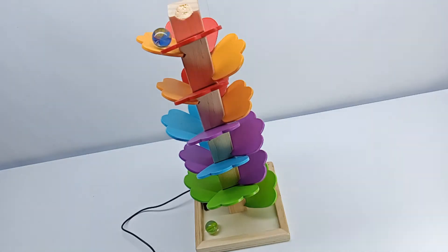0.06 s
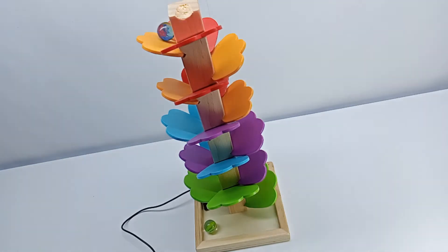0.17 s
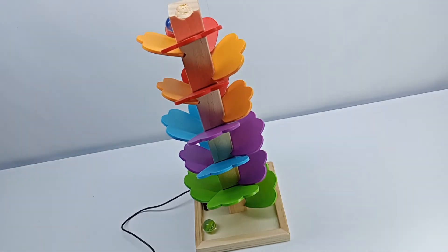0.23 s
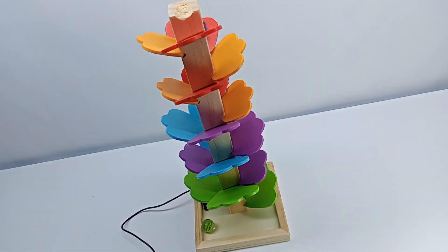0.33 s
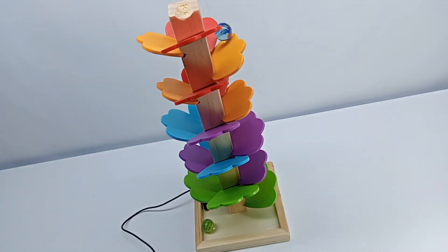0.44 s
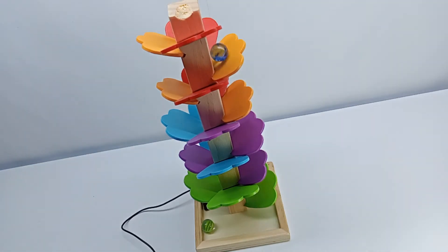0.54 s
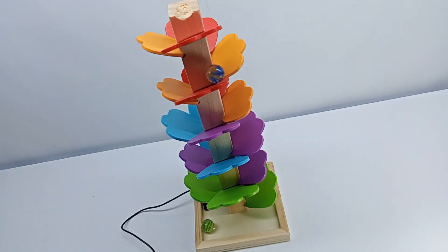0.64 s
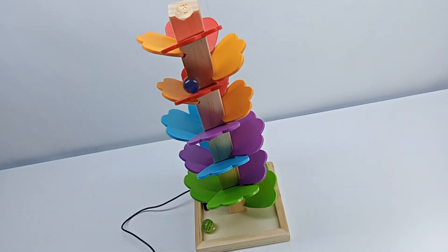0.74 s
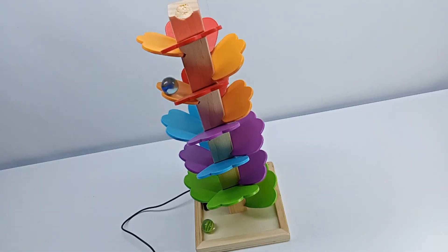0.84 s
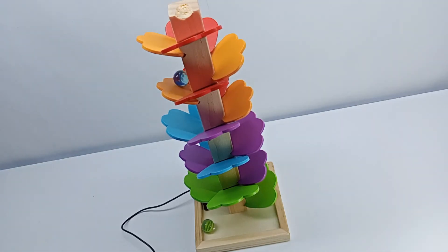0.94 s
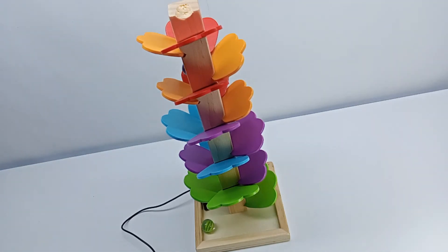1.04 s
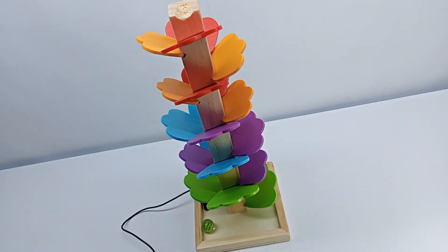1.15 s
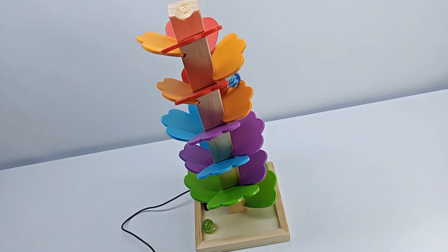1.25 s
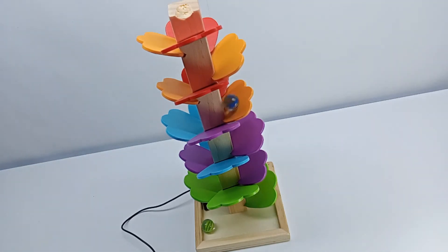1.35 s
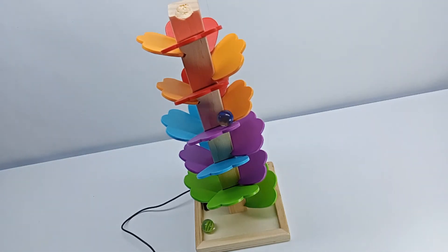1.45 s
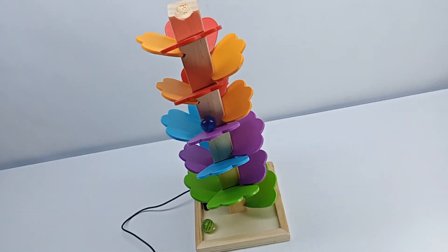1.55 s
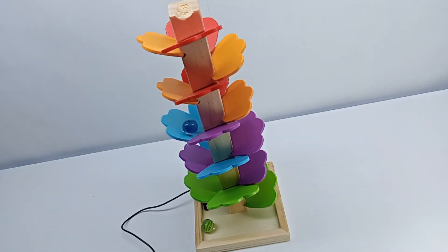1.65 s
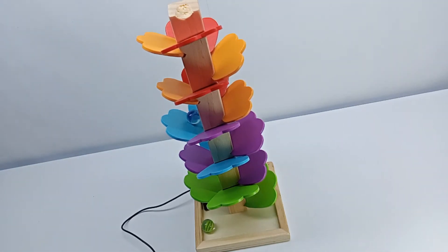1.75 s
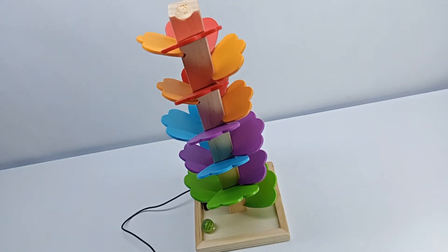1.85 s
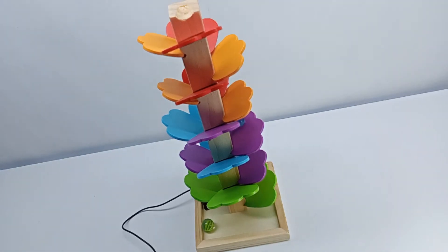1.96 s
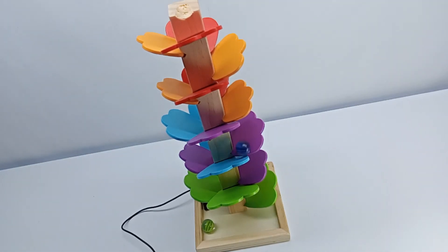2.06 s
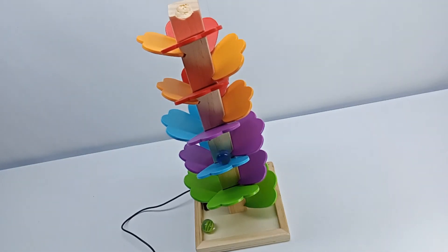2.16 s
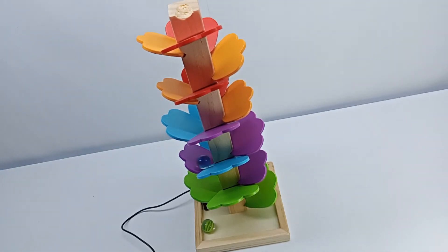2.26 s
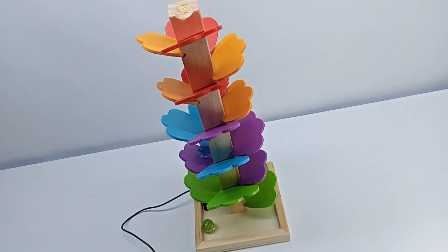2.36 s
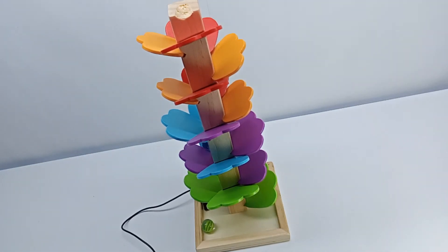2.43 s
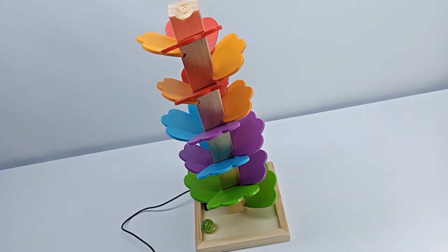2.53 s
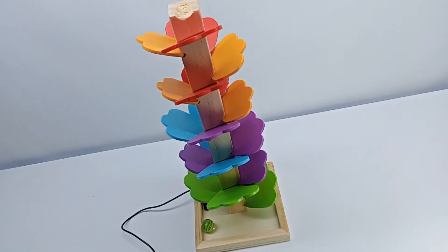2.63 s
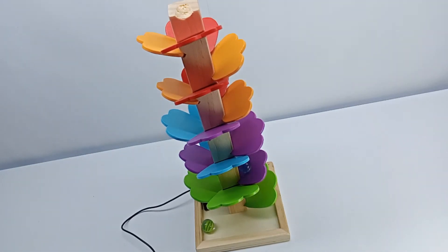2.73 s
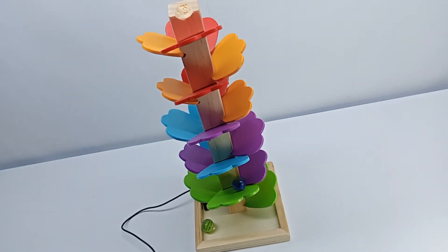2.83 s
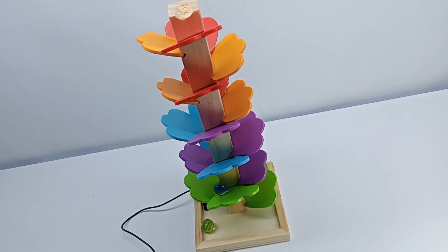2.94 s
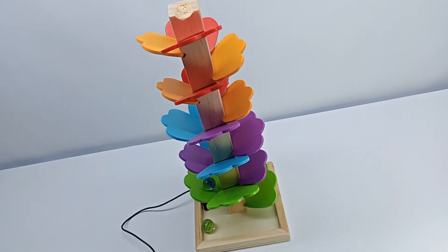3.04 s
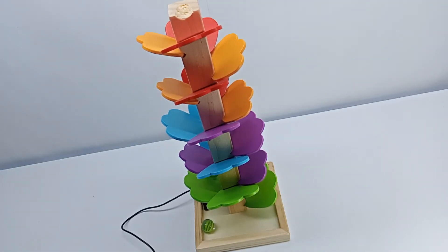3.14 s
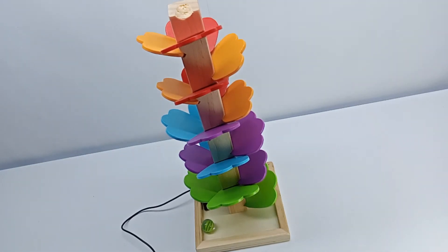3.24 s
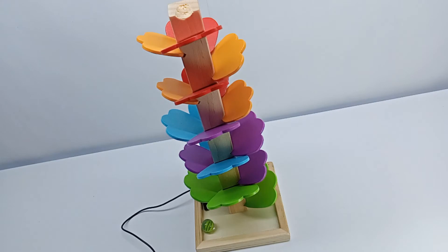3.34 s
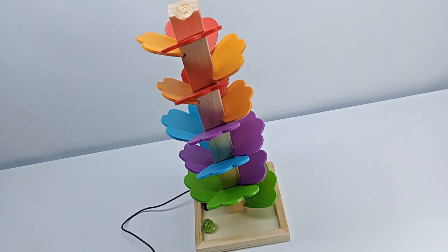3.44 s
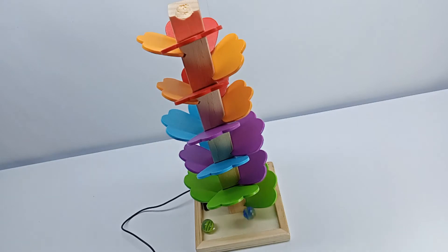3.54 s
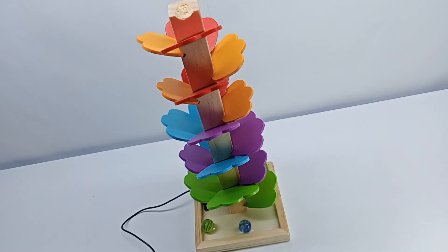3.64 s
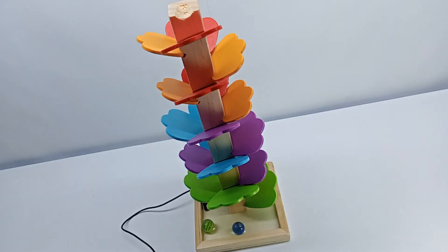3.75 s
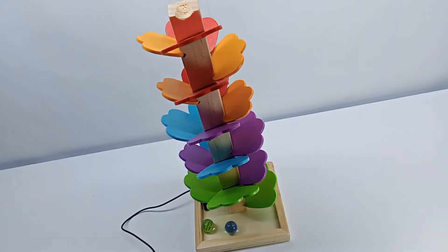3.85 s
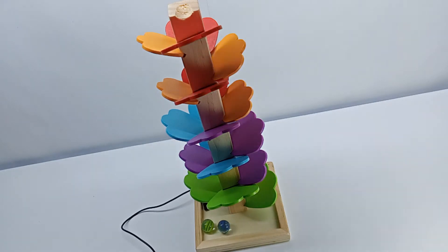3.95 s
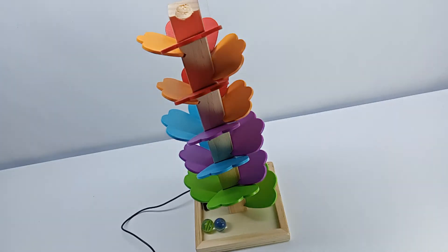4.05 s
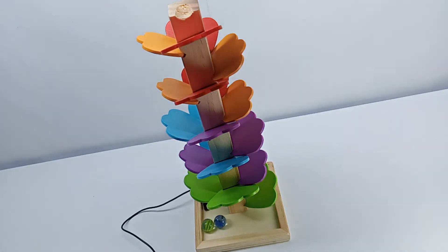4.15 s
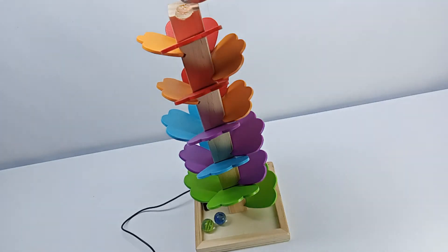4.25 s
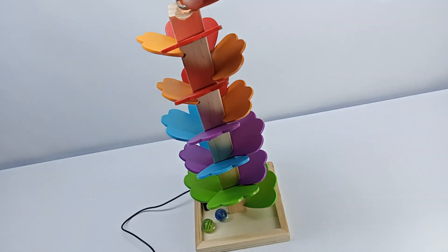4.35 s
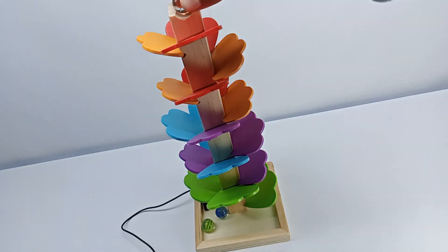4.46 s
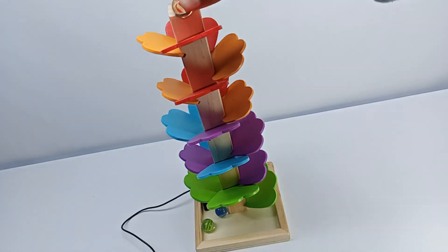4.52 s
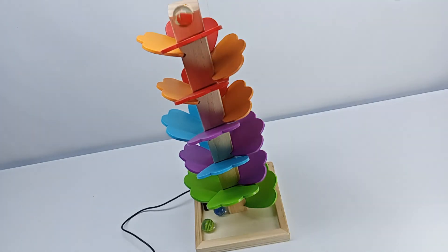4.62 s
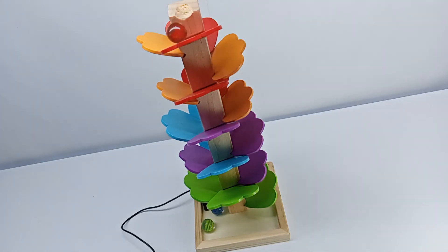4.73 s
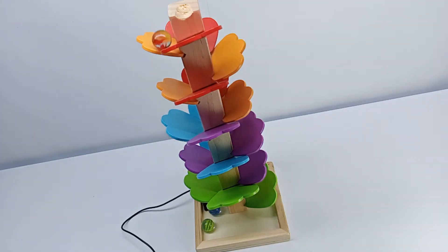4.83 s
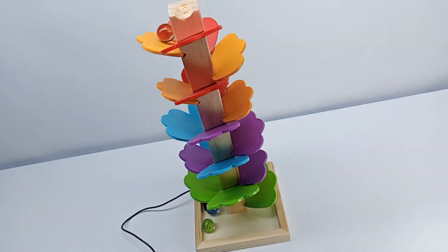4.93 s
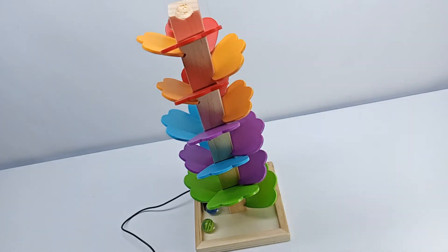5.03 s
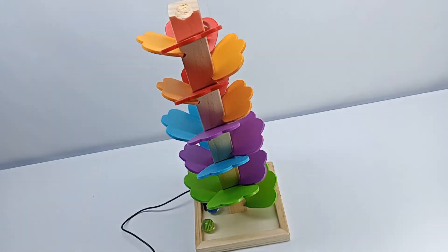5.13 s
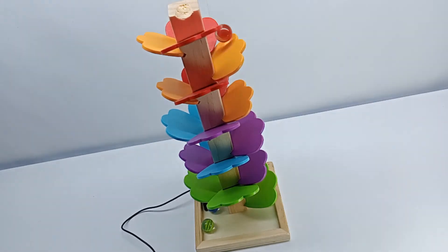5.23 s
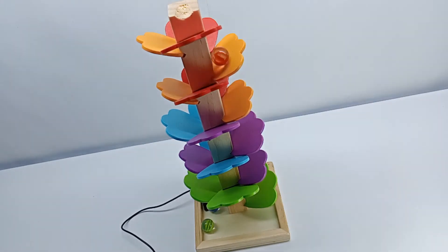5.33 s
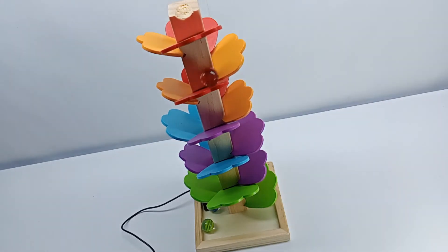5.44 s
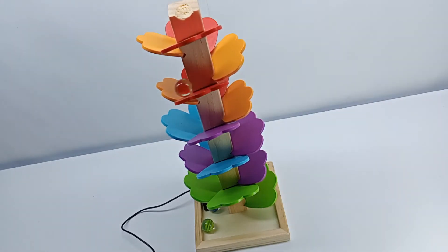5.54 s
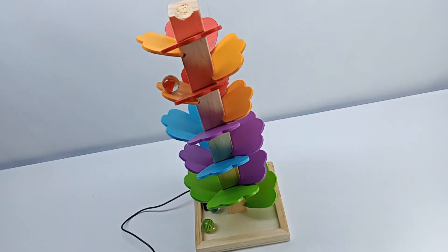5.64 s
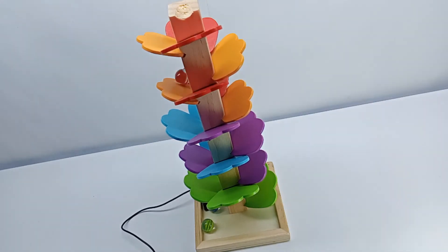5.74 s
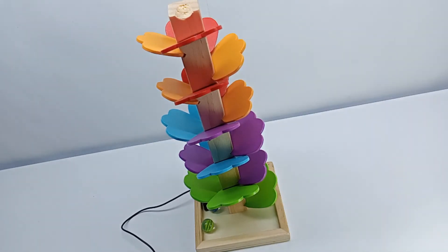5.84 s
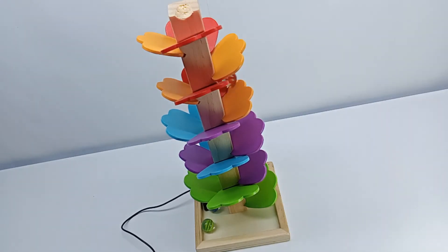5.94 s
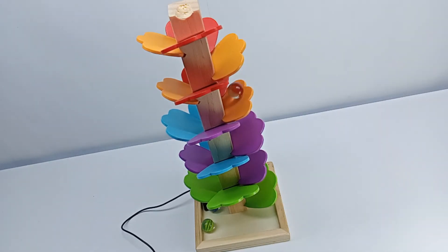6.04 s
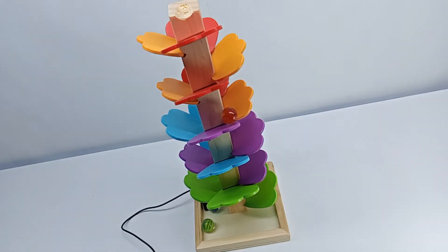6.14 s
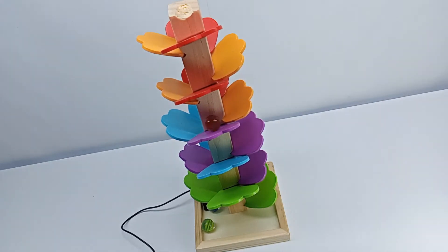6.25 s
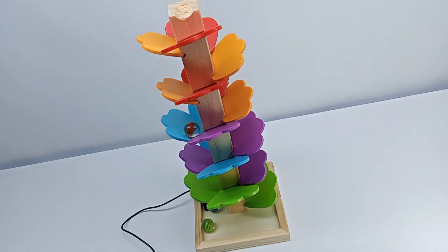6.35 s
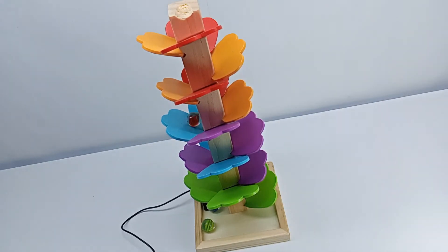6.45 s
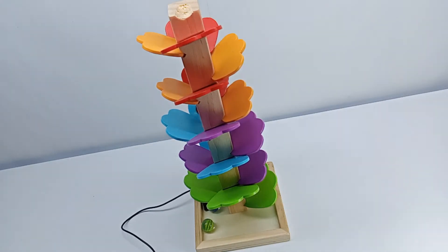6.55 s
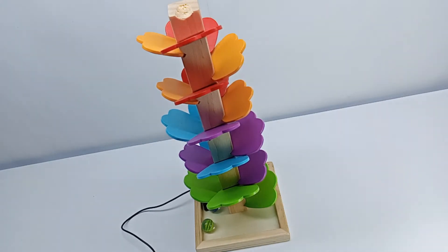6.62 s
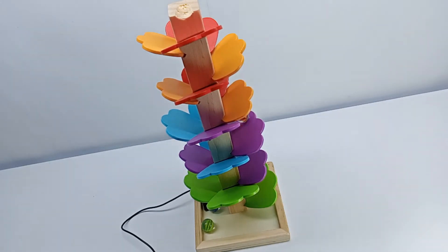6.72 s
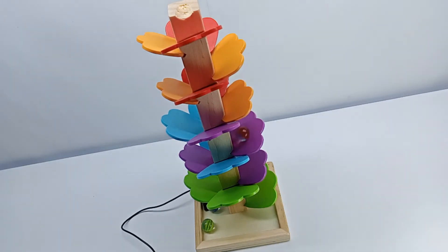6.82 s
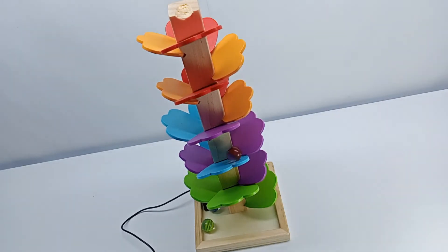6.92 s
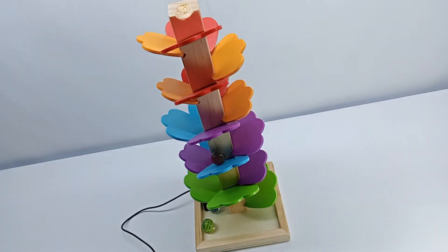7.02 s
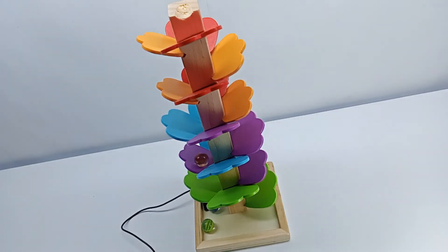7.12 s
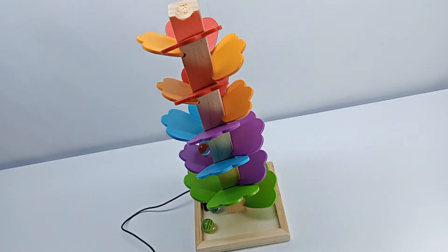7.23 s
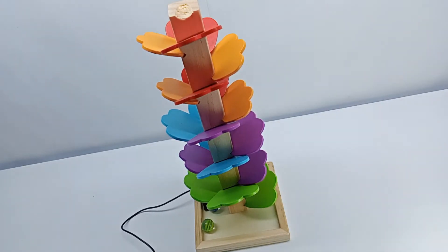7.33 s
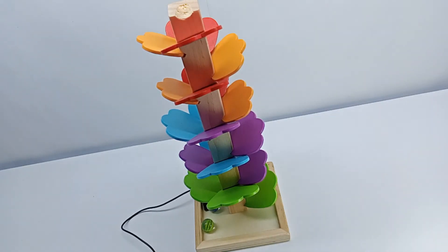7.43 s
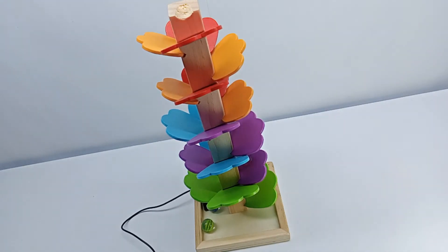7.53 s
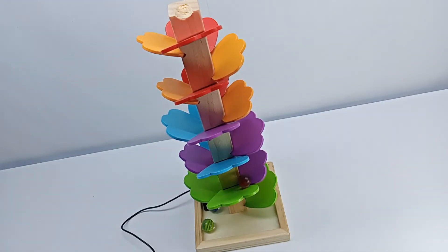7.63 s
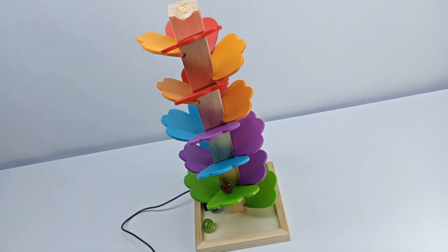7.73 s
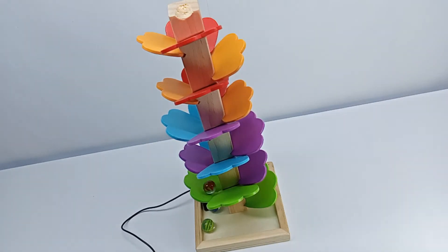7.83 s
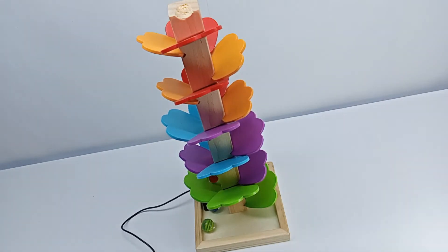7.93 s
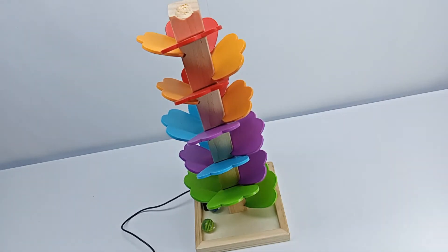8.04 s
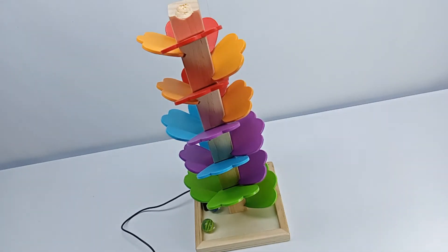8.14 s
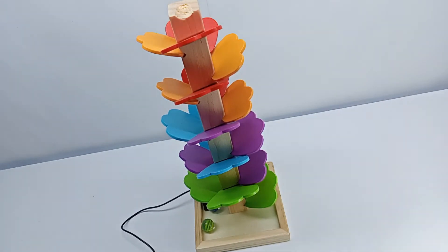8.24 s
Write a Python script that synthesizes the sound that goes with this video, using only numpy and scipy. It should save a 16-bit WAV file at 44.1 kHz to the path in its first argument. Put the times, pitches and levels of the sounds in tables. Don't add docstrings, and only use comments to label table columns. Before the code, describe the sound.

A glass marble clacks rapidly down a wooden leaf tower into a hollow tray, then after a short pause a second follows.

```python
import sys
import numpy as np
from scipy import signal
from scipy.fft import rfft, irfft
from scipy.io import wavfile
from scipy.ndimage import uniform_filter1d

SR = 44100
rng = np.random.default_rng(int(sys.argv[2]) if len(sys.argv) > 2 else 0)


def invert_db(level):
    return 10 ** (np.asarray(level, dtype=float) / 20)


def dump(signal):
    limited = np.clip(np.atleast_2d(signal).T, -1, 1)
    pcm = np.round(limited * 32767).astype(np.int16)
    wavfile.write(sys.argv[1], SR, pcm)


N = 365139

# deep_hz, low_hz, middle_hz, high_hz, treble_hz
LEAF_HZ = [(1680, 2690, 4110, 6050, 8100), (1610, 2970, 3640, 5620, 9020), (1680, 2480, 4310, 5880, 7620),
           (2020, 2650, 3550, 5100, 8700), (1610, 2690, 4350, 4950, 8440), (2020, 2580, 3620, 6330, 9020),
           (1700, 2630, 3750, 4910, 8030), (1700, 2580, 3380, 5040, 9070), (2020, 2760, 3750, 6140, 8440),
           (1920, 2390, 3600, 5120, 8510), (2020, 3120, 3400, 5040, 8420), (2020, 2650, 3880, 6890, 9300),
           (2020, 2560, 3380, 7210, 7470), (1380, 2560, 3700, 6720, 8890), (1890, 3100, 3620, 4930, 7840),
           (1700, 2280, 3400, 6870, 9240), (1680, 2610, 3290, 6460, 7710), (1720, 2610, 3270, 7110, 9020),
           (1740, 2450, 3270, 5990, 8720), (1530, 2430, 3360, 5510, 8740), (2020, 3100, 3270, 5900, 7520),
           (1570, 3060, 4240, 7320, 8650)]
# deep_db, low_db, middle_db, high_db, treble_db
LEAF_DB = [(-25, -12, -12, -1, -12.5), (-27, -17.5, -6, -5, -10), (-20.5, -10.5, -1, -9, -9),
           (-36, -21.5, -7.5, -2.5, -9.5), (-23, -11, -3, -7, -11.5), (-42.5, -7.5, -6, -4.5, -14.5),
           (-24, -6.5, -4.5, -8.5, -14), (-28.5, -10, -5, -1.5, -9.5), (-16, -7, -7.5, -8.5, -9),
           (-18.5, -2, -2.5, -2.5, -7.5), (-25.5, -9, 0, -7, -3), (-22.5, -4, -6.5, -3.5, -5.5),
           (-17.5, -6, -12.5, -10.5, -15), (-23, -5, -2.5, -7, -11), (-23, -11, -4.5, -9.5, -7),
           (-18, -5.5, -6.5, -11, -8.5), (-12.5, -3.5, -5.5, -7, -10.5), (-19, -8.5, -7.5, -8, -11),
           (-12, -6, -4, -7.5, -11), (-12.5, -5, -1, -3, -7.5), (-19, -3, -12, -7.5, -10.5),
           (-17, -17, -10, -14, 1.5)]
TRAY_INDEX, OTHER_MARBLE = 20, 21
# lowest_hz, highest_hz, main_t60_s, others_t60_s, others_db, cluster_db
LEAF_CLUSTERS = [(1355, 2100, 0.028, 0.013, -11.5, 3.0), (2178, 3200, 0.025, 0.0086, -6, 1.5),
                 (3226, 4700, .014, 0.0075, -2.5, 1.5), (4804, 7400, 0.014, 0.0084, -3.5, 2),
                 (7567, 10500, 0.016, 0.0056, -2, 2.5)]
FIRST_REACHES = [-1, .11, .29, .46, .7, .87, 1.06, 1.29, 1.47, 1.71, 1.88, 2.02, 2.14, 2.345, 2.505, 2.68,
                 2.88, 3.06, 3.24, 3.44, 3.65, 4.09]
SECOND_REACHES = [4.4, 4.89, 5.07, 5.24, 5.47, 5.64, 5.84, 6.015, 6.205, 6.425, 6.6, 6.76, 6.955, 7.19,
                  7.35, 7.525, 7.715, 7.89, 8.075, 8.184, 9, 8.17]

# start_s, peak_db, brightness_db
FIRST_DESCENT = [(.002, -39.5, -10),
                 (0.1189, -14.5, 2.5), (0.1528, -21, -2), (0.184, -31, -10), (0.296, -16, 1),
               (0.336, -20.5, -2), (0.359, -30, 1.5), (0.4334, -25.5, -0.5), (0.4702, -11.5, -4),
               (0.517, -15, 3.5), (0.5537, -16.5, -7), (0.5801, -26, 1.5), (0.5963, -12.5, -5),
               (0.623, -31.5, -7.5), (0.7113, -11.5, 2.5), (0.7531, -18, -0.5), (0.78, -27.5, 8),
               (0.791, -50, 6.5), (0.8225, -23, -6.5), (0.8428, -29.5, -0.5), (0.881, -18, 6.5),
               (0.9193, -17, 4), (0.9388, -26, -4), (1.0182, -16.5, -7.5), (1.0357, -29, 2),
               (1.072, -18, 11.5), (1.1035, -16.5, 5.5), (1.2109, -18, 4.5), (1.2487, -30, -16),
                 (1.2983, -18.5, 3.5), (1.3349, -17.5, 0.5), (1.3642, -22, -2.5), (1.4357, -17, -4),
                (1.4807, -14.5, 6.5), (1.5244, -18.5, 0.0), (1.5521, -17.5, 2.5), (1.5934, -17.5, -1),
                (1.7213, -16, 4), (1.7427, -28, -1), (1.8153, -26.5, -3), (1.8867, -12, -1),
                (1.9204, -17, -4), (1.9357, -36, 5.5), (1.945, -29.5, -6), (2.0289, -14, 3.5),
                (2.0519, -30, 0.0), (2.1491, -13.5, 8), (2.1955, -15.5, 2), (2.214, -24.5, -0.5),
                (2.2732, -16, 0.5), (2.3541, -15.5, 4.5), (2.3934, -19.5, 0.0), (2.4248, -25.5, 2.5),
                (2.4362, -14, 3.5),
                 (2.5144, -11, -1), (2.537, -61, -3), (2.631, -22.5, -13), (2.6881, -13.5, 4),
               (2.7198, -20, -1.5), (2.7338, -37, 6.5), (2.7969, -18, -1), (2.8916, -14.5, 2.5),
               (2.9243, -35.5, -4), (2.9912, -23, -3), (3.069, -11, 4.5), (3.1004, -18, -6),
               (3.1731, -25, -10), (3.2505, -15.5, 2.5), (3.3344, -37.5, -4), (3.3562, -22.5, -2),
               (3.3738, -29, 0.0), (3.447, -18, 1.5), (3.4725, -31, -4.5), (3.5513, -26.5, -1.5),
               (3.659, -14.5, -2), (3.7438, -17, -2.5), (3.7809, -25, -2.5), (4.1, -32.5, 5.5)]
# start_s, peak_db, brightness_db
SECOND_DESCENT = [(4.73, -11, 2.5), (4.903, -13, 2), (4.9363, -22.5, -2), (5.0794, -16.5, 5),
                  (5.1187, -20.5, -4.5), (5.1399, -26.5, 4), (5.2237, -33, -6.5), (5.25, -11, -2.5),
                  (5.3006, -14.5, 0.5), (5.34, -14.5, -5), (5.3673, -16, -16.5), (5.3786, -14.5, 2),
                  (5.4076, -24, -4), (5.4817, -11.5, 4), (5.5217, -21, 2.5), (5.5467, -22.5, 5.5),
                  (5.573, -32.5, 3), (5.5935, -26, -10), (5.6176, -25.5, 1), (5.647, -16.5, 10),
                  (5.6883, -17.5, 4.5), (5.7101, -24, -4), (5.7268, -31.5, -5), (5.7762, -16.5, 0.5),
                  (5.795, -27, 4.5), (5.8462, -11.5, 3), (5.8735, -23.5, 5.5), (5.9732, -14, -1.5),
                  (6.0226, -17.5, 5), (6.0484, -33, 0.0), (6.0624, -31, -4), (6.17, -27, -3),
                 (6.187, -25.5, -6), (6.2125, -13, 0.0), (6.2491, -20.5, 1.5), (6.2791, -24, -2),
                 (6.2952, -29.5, -3), (6.3467, -21, -1.5), (6.3769, -18.5, 2.5), (6.4343, -15.5, 4.5),
                 (6.4557, -30.5, 0.0), (6.5291, -33, 0.5), (6.6088, -11.5, -1), (6.634, -23, -3),
                 (6.652, -36.5, -4), (6.7347, -27.5, -8.5), (6.7681, -16, 4), (6.7948, -24, -7),
                 (6.8195, -27.5, 2), (6.9294, -17.5, -0.5), (6.9639, -11, 4.5), (6.996, -20.5, 1),
                 (7.0827, -15, 0.0),
                  (7.1984, -15, 4.5), (7.2342, -15.5, 0.5), (7.258, -31.5, 12), (7.284, -16.5, 4.5),
                (7.357, -11, -1), (7.4701, -22.5, -12), (7.535, -14, 7), (7.5673, -21.5, 2.5),
                (7.5787, -27, 1), (7.6368, -16, 3.5), (7.7209, -15, 1), (7.744, -24.5, -1),
                (7.8295, -19, -3), (7.8472, -32, -0.5), (7.901, -13, 2.5), (7.931, -15, -4),
                (8.004, -27.5, -7.5), (8.032, -26, -6), (8.0833, -16, 1), (8.1022, -26.5, 0.0),
                (8.1778, -22, 13.5), (8.1885, -28, 2.5), (8.1987, -31, 2.5)]
FIRST_BLOWS = FIRST_DESCENT
SECOND_BLOWS = SECOND_DESCENT
BLOWS = [(s, db - 12, bright) for s, db, bright in FIRST_BLOWS + SECOND_BLOWS]

# loudest_ring_hz, low_notes_db, middle_notes_db
FIRST_DESCENT_COLOUR = [(5640, -6.0, -7.0), (4220, -4.0, 1.0), (6080, -1.0, 11.0), (5290, -1.0, -3.0),
                          (3080, 6.0, 2.0), (2480, 2.0, -3.0), (3830, -2.0, 1.0), (3850, 3.0, -5.0),
                          (4370, 5.0, 0.0), (5980, -2.0, 2.0), (3530, -1.0, 3.0), (4970, 10.0, -4.0),
                          (5350, -5.0, -9.0), (5360, 4.0, -14.0), (4020, 0.0, -1.0), (4370, -4.0, 2.0),
                          (4470, 0.0, -2.0), (4940, 7.0, 1.0), (2590, 3.0, -7.0), (2660, 10.0, -4.0),
                          (4790, -4.0, 0.0), (6420, 2.0, -7.0), (5050, 2.0, -2.0), (2930, -6.0, -3.0),
                          (5590, 2.0, -1.0), (4600, -2.0, 6.0), (4900, 0.0, -13.0), (2630, 2.0, -12.0),
                          (2620, -2.0, -10.0),
                          (4230, -7.0, 0.0), (3400, -1.0, 1.0), (5040, 3.0, -7.0), (5000, 3.0, -10.0),
                         (9050, 1.0, 7.0), (2780, 2.0, -6.0), (3760, 4.0, -1.0), (2630, -1.0, -6.0),
                         (6640, 0.0, 0.0), (2900, 5.0, 2.0), (3170, 3.0, -2.0), (4080, 2.0, 6.0),
                         (3410, -1.0, 0.0), (3130, 12.0, 3.0), (3350, -7.0, -7.0), (6540, -2.0, -1.0),
                         (3890, -2.0, 2.0), (2730, 0.0, -3.0), (3060, -2.0, -2.0), (2870, -3.0, 6.0),
                         (2710, -3.0, 5.0), (3040, 1.0, -9.0), (3710, -10.0, 5.0), (6180, 2.0, 3.0),
                         (3710, -4.0, -2.0),
                          (3820, -2.0, -1.0), (3090, 12.0, 12.0), (3800, 0.0, -2.0), (2670, -2.0, 1.0),
                        (2300, 5.0, -3.0), (2280, 8.0, 2.0), (2250, 1.0, -7.0), (2570, -2.0, 1.0),
                        (2590, 5.0, -8.0), (2590, 1.0, -6.0), (7040, -3.0, 2.0), (2730, 0.0, -4.0),
                        (2650, 0.0, -5.0), (3090, 5.0, 2.0), (3330, 0.0, 1.0), (2260, -1.0, -4.0),
                        (2680, -1.0, 0.0), (5440, -2.0, 4.0), (2410, -6.0, 1.0), (2340, 0.0, -3.0),
                        (3180, -1.0, 2.0), (3180, -1.0, 2.0), (3180, 0.0, 2.0), (6630, -5.0, 0.0)]
SECOND_DESCENT_COLOUR = [(6310, 0.0, 0.0), (4250, -4.0, -3.0), (5610, 0.0, -3.0), (3360, 5.0, 3.0),
                           (2490, -1.0, -7.0), (4290, 1.0, 5.0), (2490, -1.0, -9.0), (4370, -2.0, 5.0),
                           (3560, -2.0, -4.0), (5110, 4.0, -14.0), (4960, -11.0, -8.0), (5340, 2.0, -3.0),
                           (5360, 0.0, -2.0), (4050, -4.0, -2.0), (4240, 6.0, 4.0), (5700, -2.0, 1.0),
                           (4830, -7.0, -5.0), (2620, 2.0, -4.0), (4960, 3.0, 5.0), (5260, 5.0, 8.0),
                           (6320, 3.0, 4.0), (5290, -1.0, -6.0), (2560, 4.0, -5.0), (5040, 1.0, -3.0),
                           (5300, -3.0, -7.0), (3710, -4.0, 5.0), (3740, 5.0, 3.0), (4950, -2.0, -2.0),
                           (4250, 1.0, 5.0), (4240, 2.0, 3.0), (5650, 0.0, -4.0), (2200, 0.0, -3.0),
                          (5660, -6.0, -3.0), (3080, -5.0, 3.0), (3740, -4.0, -1.0), (2250, -7.0, -12.0),
                          (3780, -1.0, 2.0), (4010, 0.0, 4.0), (6010, -4.0, -2.0), (3850, 1.0, 5.0),
                          (3530, -7.0, 5.0), (2190, 4.0, -2.0), (3790, 1.0, 4.0), (3390, 1.0, 5.0),
                          (3490, -5.0, -1.0), (2240, -4.0, 0.0), (6660, 2.0, 0.0), (2660, 1.0, 4.0),
                          (2480, 5.0, 0.0), (2470, -5.0, -7.0), (7150, -3.0, 3.0), (2910, -2.0, 0.0),
                          (2590, -2.0, -2.0),
                           (2900, 1.0, -4.0), (3700, -4.0, 4.0), (3540, 6.0, 3.0), (3670, -4.0, -5.0),
                         (3670, -4.0, 0.0), (3080, -1.0, -8.0), (3410, 2.0, 1.0), (2270, 0.0, -1.0),
                         (3590, -7.0, 4.0), (3410, -7.0, 6.0), (2560, 1.0, 1.0), (2640, 6.0, 0.0),
                         (2580, -1.0, -5.0), (2630, 4.0, 0.0), (3270, -2.0, 6.0), (2590, 0.0, 4.0),
                         (2590, 2.0, -8.0), (2670, 1.0, 2.0), (3060, 3.0, 1.0), (3070, 2.0, -4.0),
                         (8710, -14.0, -14.0), (8630, -1.0, 2.0), (8600, -7.0, -8.0)]
FIRST_COLOURS = FIRST_DESCENT_COLOUR
COLOURS = FIRST_COLOURS + SECOND_DESCENT_COLOUR
# start_s, peak_db
SKIPS = [(.452, -36), (.6863, -44), (1.3912, -35), (1.6262, -38), (2.1141, -42), (2.2583, -40),
         (2.5551, -36), (3.186, -36), (3.197, -38), (3.5892, -42), (3.612, -42), (5.165, -38),
         (5.9314, -45), (7.666, -37), (8.157, -42)]

# time_s, level_db, trunk_knock_db
ROLL = [(0.0, -71, -67), (0.3, -64.5, -69.5), (0.8, -60, -71.5), (2.2, -57, -71.5), (3.57, -61.5, -76),
        (3.701, -81, -60), (3.94, -102, -85), (4.7, -92, -64), (4.76, -66, -65), (5.49, -58, -73),
        (5.88, -64, -76.5), (7, -59.5, -74.5), (8.05, -61.5, -76.5), (8.28, -65, -85)]
# t60_s, level_db
ROLL_MODES = [(0.031, 8.5), (0.015, 4.5), (.012, 0.5), (0.0045, -1), (.005, -5)]
# pitch_hz, level_db, t60_s
TRUNK_MODES = [(466, -4.5, 0.0594), (590.3, 2.5, 0.037), (696.5, -2.5, 0.029), (811, -3.5, 0.028),
               (927, -5.5, 0.037)]
# level_db, slope (dB per dB of blow), pitch_spread (0-1)
TRUNK_KNOCK = (9.1, 0.18, 0.11)
# pitch_hz, level_db, t60_s
TABLE = [(91.5, -25, 0.024), (116, 8.5, 0.065), (158, 10.5, 0.04), (227, -3, 0.07), (333, -23.5, 0.16)]
# pitch_hz, level_db, t60_s
TRAY = [(378, -23.5, .07), (452, -1.5, 0.05), (570, -11, 0.056), (696, -3.5, 0.02), (900, -14, 0.05),
        (1160, 1.5, 0.018), (2870, -1.5, 0.07), (3230, 11, 0.03), (3420, 11, .022)]
# start_s, pitch_hz, level_db, t60_s
PLACING = [
    (4.428, 888, -72, 0.25),
    (4.428, 1740, -69.5, 0.11),
    (4.428, 2440, -57, 0.018),
    (4.555, 108, -61.5, .092),
]
# start_s, pitch_hz, level_db, t60_s
TRAY_KICK = (8.175, 270, -40, .016)
# pitch_hz, width_hz, level_db
VALLEY = (360, 130, -4)
# pitch_hz, level_db (dB per Hz)
AIR = [(18, -50), (30, -4), (89, 12.5), (241, 4.5), (455, -1.5), (1110, -5.5), (1260, -15.5), (13000, -27)]
# pitch_hz, t60_s, level_db
ROOM = [(324, 0.17, -28), (1290, 0.13, -17), (3000, 0.1, -26.5), (6000, 0.16, -19), (12000, 0.15, -21.5)]


def level(x, db):
    return x * invert_db(db) / np.sqrt(np.mean(x ** 2) + 1e-30)


def band(x, hz, width_hz):
    return signal.lfilter(*signal.iirpeak(hz, hz / width_hz, SR), x)


def decay_pole(hz, t60):
    return np.exp((2j * np.pi * hz - np.log(1000) / t60) / SR)


def ring(x, modes):
    return sum(invert_db(db) * signal.lfilter([1], [1, -decay_pole(hz, t60)], x).imag for hz, db, t60 in modes)


def moving_mode(x, hz, t60):
    edges = np.r_[0, np.flatnonzero(np.diff(hz)) + 1, len(x)]
    parts, state = [], np.zeros(1, complex)
    for a, b in zip(edges, edges[1:]):
        part, state = signal.lfilter([1], [1, -decay_pole(hz[a], t60)], x[a:b], zi=state)
        parts.append(part.imag)
    return np.concatenate(parts)


def cluster(t, hz, gains, t60, turn):
    first_9ms = SR // 110
    heard = max(int(np.max(t60) * SR), first_9ms)
    t_heard, hz, t60, turn = (np.float32(v) for v in (t[:heard], hz, t60, turn))
    waves = np.sin(np.float32(2 * np.pi) * (hz[:, None] * t_heard + turn[:, None]))
    fades = np.exp(-np.float32(np.log(1000)) * t_heard / t60[:, None])
    sound = np.zeros(len(t))
    sound[:heard] = np.float32(gains) @ (waves * fades)
    return sound / np.std(sound[:first_9ms])


def scatter(sound, db, t60):
    t = np.arange(len(sound)) / SR
    paths = rng.standard_normal(len(t)) * 1000 ** (-t / t60)
    smeared = signal.fftconvolve(sound, paths / np.linalg.norm(paths))[:len(t)]
    return sound + invert_db(db) * smeared


def strikes(s, gain):
    x = np.zeros(N)
    np.add.at(x, (np.asarray(s) * SR).astype(int), gain)
    return x


def leaf_at(s):
    reached = np.array(FIRST_REACHES + SECOND_REACHES)
    order = np.argsort(reached)
    return order[np.searchsorted(reached[order], s) - 1] % len(LEAF_HZ)


def air():
    hz = np.fft.rfftfreq(N, 1 / SR) + 1
    point_hz, point_db = np.transpose(AIR[:-1])
    db = np.interp(np.log(hz), np.log(point_hz), point_db)
    return level(irfft(rfft(rng.standard_normal(N)) * invert_db(db), N), -77.5)


def rolling(level_db):
    patch_s, patchy_db = 0.018, 5.5
    flight_s, flight_db = 0.066, -4
    t = np.arange(N) / SR
    leaf = np.minimum(leaf_at(t), TRAY_INDEX)
    hold = int(patch_s * SR)
    patches = uniform_filter1d(np.repeat(rng.standard_normal(N // 100), hold)[:N], hold // 2)
    flight = uniform_filter1d(1. * (leaf_at(t + flight_s) != leaf_at(t - .008)), size=200)

    ticks = rng.random(N) < 9000 / SR
    grit = ticks * rng.standard_normal(N) * invert_db(6 * rng.random(N))
    sound = np.zeros(N)
    for hz, db, (t60, part_db) in zip(np.transpose(LEAF_HZ), np.transpose(LEAF_DB), ROLL_MODES):
        note = moving_mode(grit, 1. * hz[leaf], t60)
        sound += level(note, part_db) * invert_db(db[leaf])
    scrape = band(band(grit, 4600., 4200.), 4600., 4200.)
    hard_edge = np.diff(grit, 2, prepend=[0, 0])
    sound += level(scrape, -9) + level(ring(grit, TRUNK_MODES), -16.5) + level(hard_edge, -11.5)
    return invert_db(level_db + patchy_db * patches + flight_db * flight) * sound


def leaf_ring(t, leaf, bright, colour, chance):
    big_leaf_from, big_leaf_ring, glass_ring = 16, 1.9, 0.4
    loudest_hz, low_db, middle_db = colour
    shares = np.add(LEAF_DB[leaf], bright * np.linspace(-1, 1, 5) + [low_db, low_db, middle_db, 0, 0])
    sound = np.zeros(len(t))
    for number, (lo, hi, main_t60, short_t60, others_db, part_db) in enumerate(LEAF_CLUSTERS):
        where, size, turn = chance[number]
        crowd_hz = lo * (hi / lo) ** where[1:]
        crowd_db = others_db - 14 * size[1:] + 7
        if lo <= loudest_hz < hi:
            crowd_hz[0] = loudest_hz
            crowd_db[0] += 16.5 * (.5 + size[1])
        if big_leaf_from <= leaf < TRAY_INDEX and number < 2:
            main_t60 = main_t60 * big_leaf_ring
        t60 = np.r_[main_t60, short_t60 * (.5 + turn[1:])]
        if leaf == OTHER_MARBLE:
            t60 = t60 * glass_ring
        notes = cluster(t, np.r_[LEAF_HZ[leaf][number], crowd_hz], np.r_[1, invert_db(crowd_db)], t60, turn)
        sound += invert_db(shares[number] + part_db) * notes
    return sound


def trunk_knock(t, chance):
    spread = TRUNK_KNOCK[2]
    hz, mode_db, t60 = np.transpose(TRUNK_MODES)
    where, size, turn = chance[:, :len(hz)]
    pitches = hz * (1 + spread * (where - .5))
    knock = cluster(t, pitches, (.5 + size) * invert_db(mode_db), t60 * (.5 + turn), 0 * turn)
    return scatter(knock, 1.33, 0.12)


def blows(rows, colours, knock_db):
    tick_db, tick_s, rise_s = 3, 0.002, 0.00085
    trunk_db, slope, _ = TRUNK_KNOCK
    out, t = np.zeros(N + SR), np.arange(SR // 11) / SR
    soft_start = 1 - np.exp(-(t / rise_s) ** 2)
    chances = rng.random((len(rows), 6, 3, 20))
    for (s, db, bright), colour, chance in zip(rows, colours, chances):
        leaf, at = leaf_at(s), int(s * SR)
        noise = np.diff(rng.standard_normal(len(t) + 1))
        tick = noise * np.exp(-t / tick_s) * invert_db(bright + tick_db - 6.5)
        sound = invert_db(db) * (tick + leaf_ring(t, leaf, bright, colour, chance))
        knock_gain = invert_db(knock_db[at] + trunk_db + slope * (db + 53.0))
        sound += knock_gain * trunk_knock(t, chance[5])
        scatter_db = -13 if leaf == OTHER_MARBLE else -1
        out[at:at + len(t)] += scatter(sound * soft_start, scatter_db, 0.029)
    return out[:N]


def table():
    thud_db, thud_slope, push_s = -44, 0.35, 0.004
    s, db = np.transpose(BLOWS)[:2]
    push_db = thud_db + thud_slope * (db + 30) + 2.5 * rng.standard_normal(len(s))
    hits = strikes(s, invert_db(push_db) * (leaf_at(s) < OTHER_MARBLE))
    push = np.arange(SR // 10) / SR / push_s
    thud = signal.fftconvolve(hits, push * np.exp(-push) / (push_s * SR))[:N]
    shudder = signal.fftconvolve(hits, np.exp(-push / 8))[:N] * rng.standard_normal(N)
    return ring(invert_db(-7.0) * thud + invert_db(-44.5) * shudder, TABLE)


def room(x):
    t = np.arange(SR // 3) / SR
    tail = np.zeros(len(t))
    for hz, t60, db in ROOM:
        noise = band(rng.standard_normal(len(t)), hz, hz)
        tail += invert_db(db) * noise * 1000 ** (-t / t60) / np.sqrt(hz * t60 / 8)
    return signal.fftconvolve(x, tail * (1 - np.exp(-(t / 0.011) ** 2)))[:N]


def tray():
    from_s, to_s, tray_db = 3.62, 3.9, -9
    s, db = np.transpose([b[:2] for b in BLOWS if from_s < b[0] < to_s])
    return scatter(ring(strikes(s + 0.002, invert_db(db + tray_db)), TRAY), -1.5, 0.12)


def placing():
    return sum(ring(strikes([s], 1), [(hz, db, t60)]) for s, hz, db, t60 in PLACING + [TRAY_KICK])


def scene():
    s, *columns = np.transpose(ROLL)
    level_db, knock_db = (np.interp(np.arange(N) / SR, s, c) for c in columns)
    skips = [(s, db - 14, -5) for s, db in SKIPS]
    no_colours = np.zeros((len(SKIPS), 3))
    tree = rolling(level_db) + blows(BLOWS, COLOURS, knock_db) + blows(skips, no_colours, knock_db) + table()
    valley_hz, width_hz, valley_db = VALLEY
    tree = tree - (1 - invert_db(valley_db)) * band(tree, valley_hz, width_hz)
    near = tree + tray() + placing()
    return (near + room(near) + air())[None]


def roll_off(x):
    return signal.sosfilt(signal.butter(12, 17150, fs=SR, output="sos"), x)


def record(dry):
    dip_hz, dip_width_hz, dip_db = 12300, 3600.0, -5
    peak_hz, peak_width_hz, peak_db = 15350, 1500, 10
    lowest_hz, highest_hz = 75, 16100
    dipped = dry - (1 - invert_db(dip_db)) * band(dry, dip_hz, dip_width_hz)
    peak = band(band(dry, peak_hz, peak_width_hz), peak_hz, peak_width_hz)
    mic = dipped + invert_db(peak_db) * peak
    mic = signal.sosfilt(signal.butter(4, lowest_hz, "high", fs=SR, output="sos"), mic)
    mic = signal.sosfilt(signal.butter(10, highest_hz, fs=SR, output="sos"), mic)
    return roll_off(mic)


dry = scene()
out = record(dry)
dump(out)
```